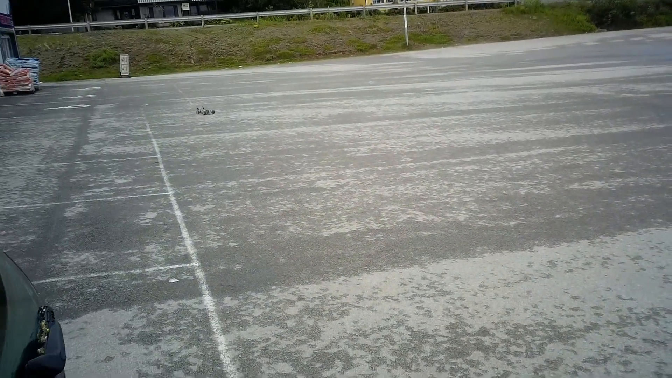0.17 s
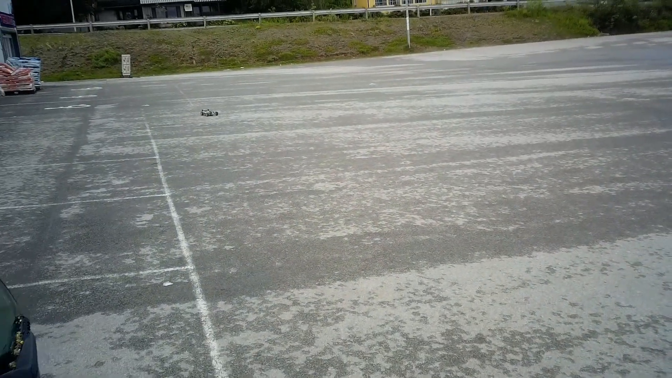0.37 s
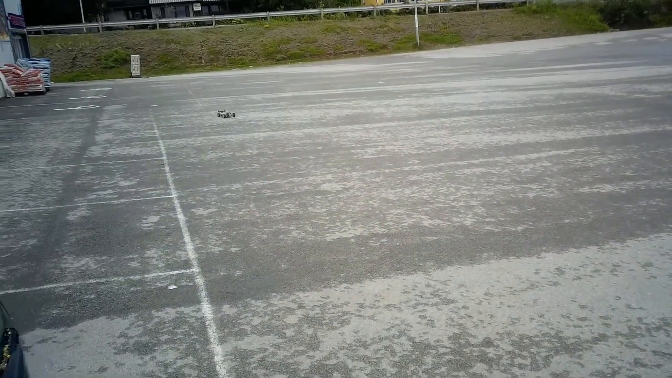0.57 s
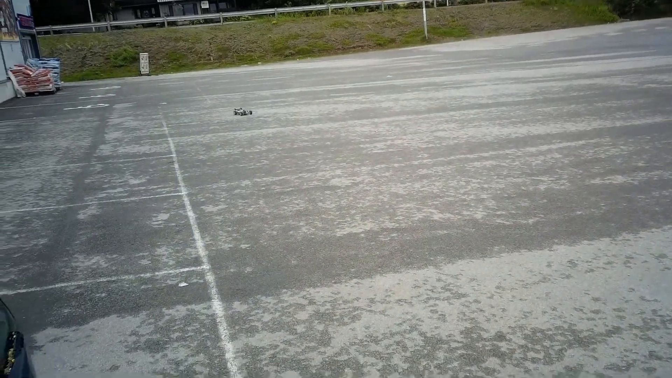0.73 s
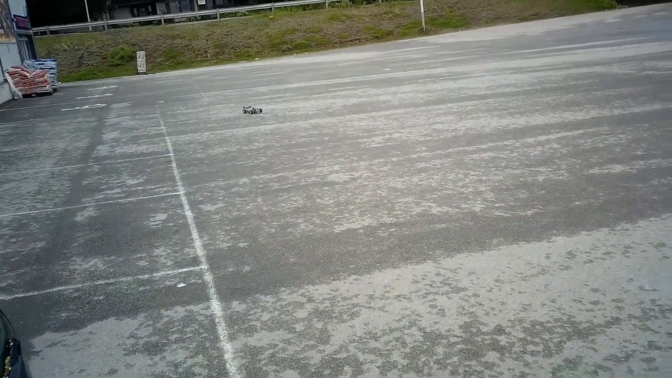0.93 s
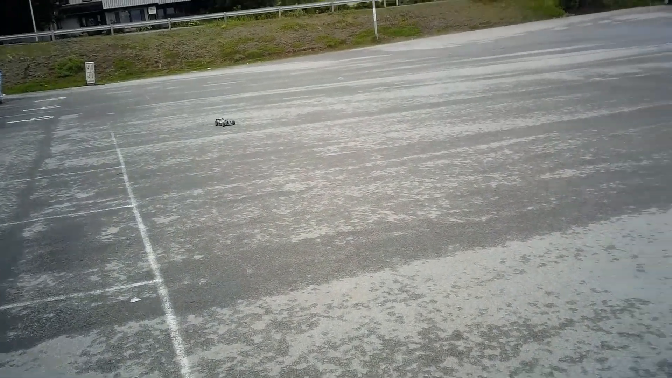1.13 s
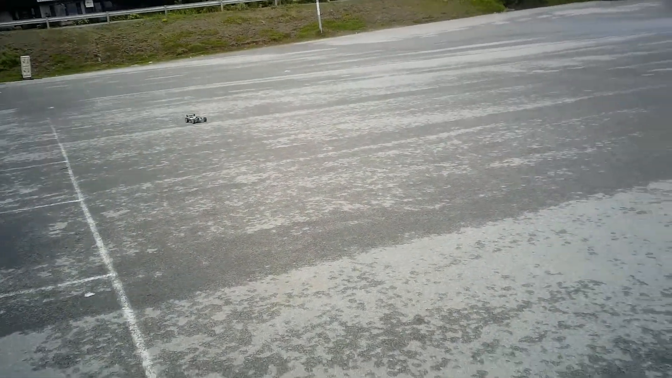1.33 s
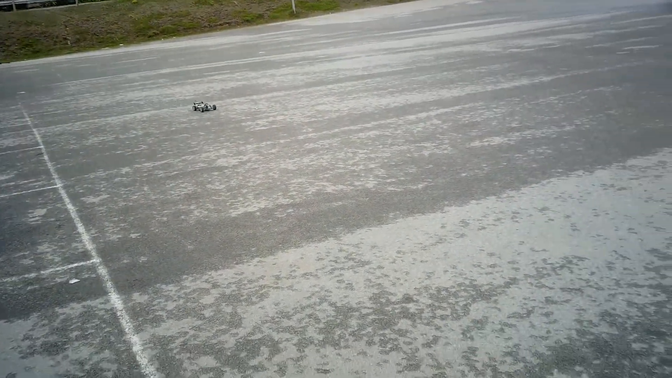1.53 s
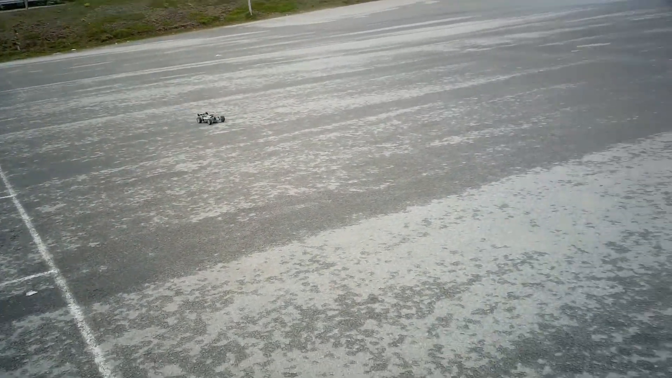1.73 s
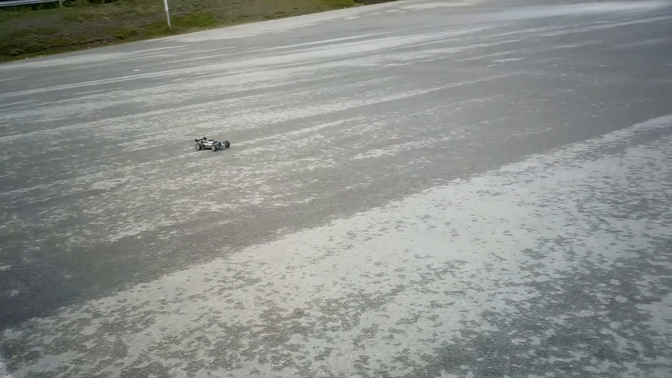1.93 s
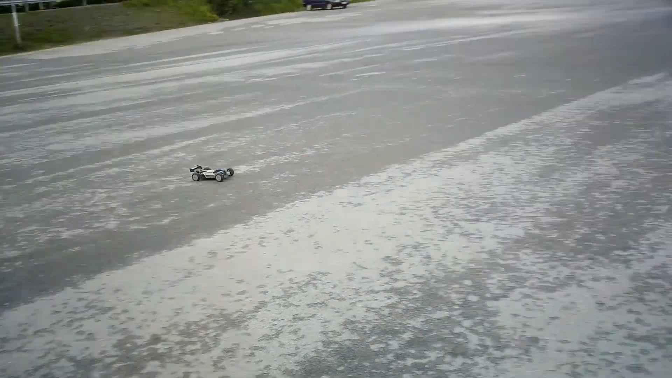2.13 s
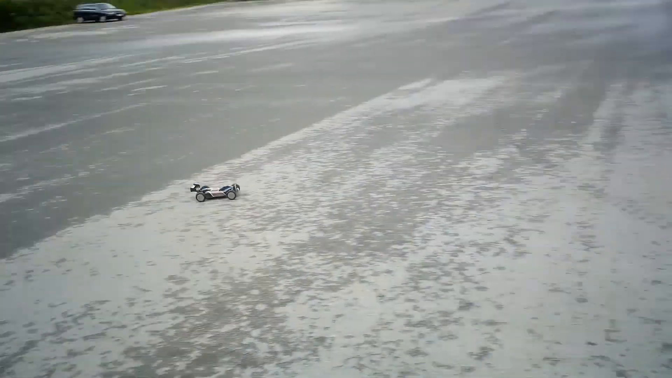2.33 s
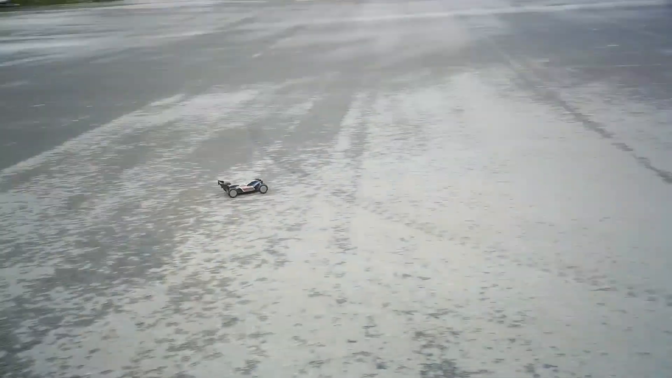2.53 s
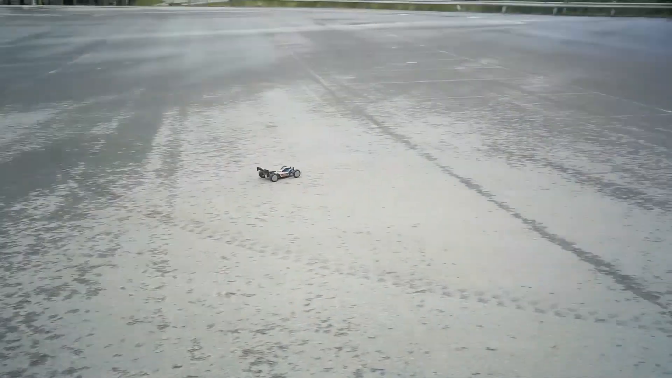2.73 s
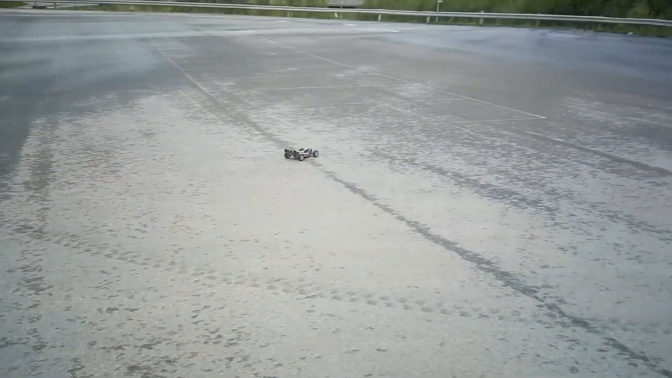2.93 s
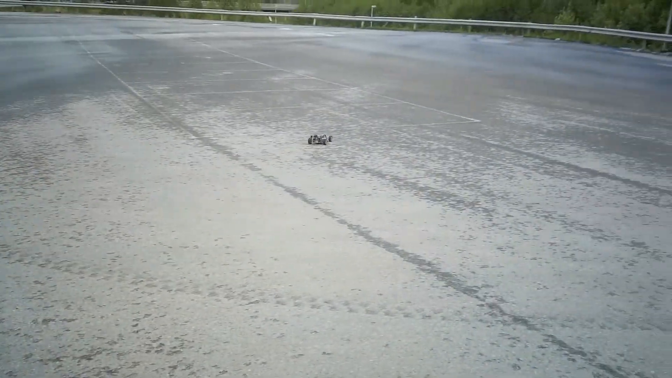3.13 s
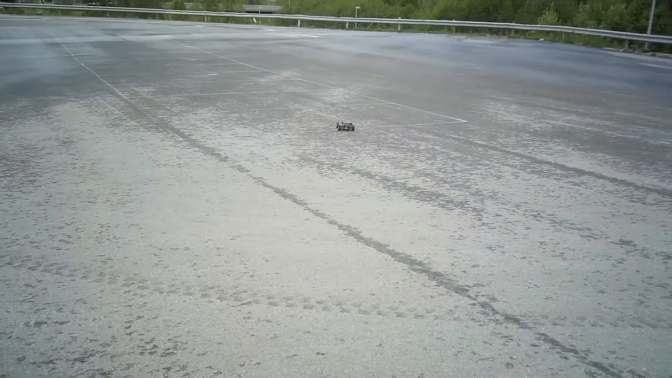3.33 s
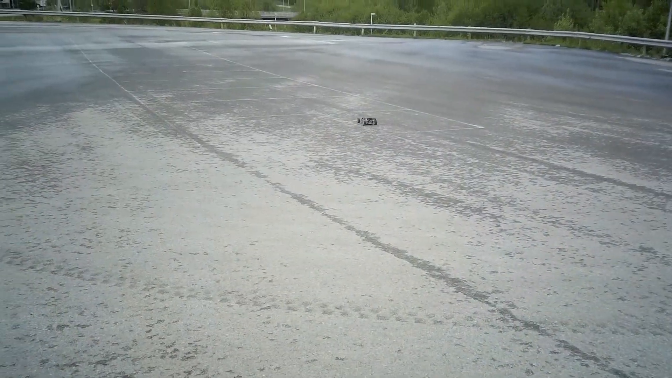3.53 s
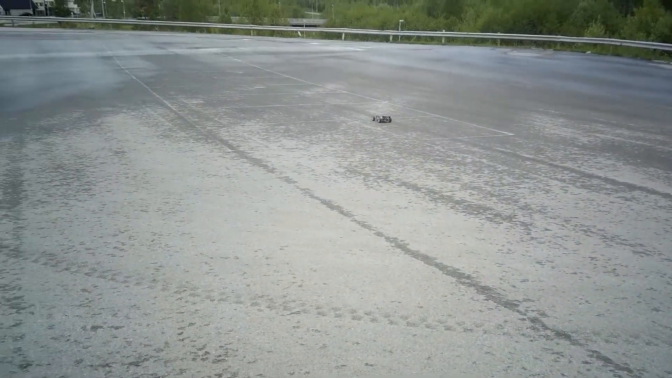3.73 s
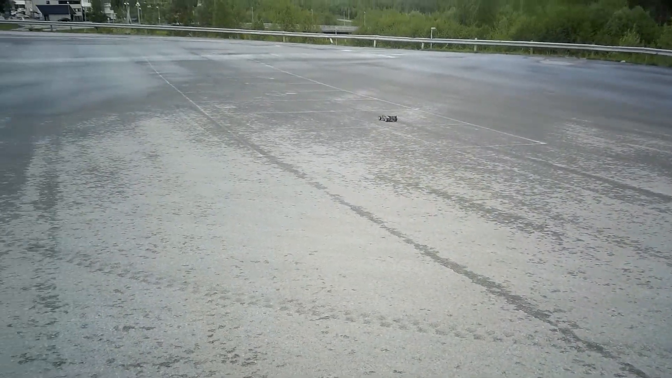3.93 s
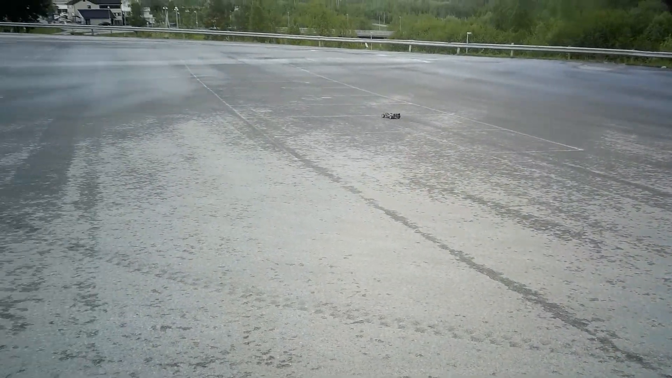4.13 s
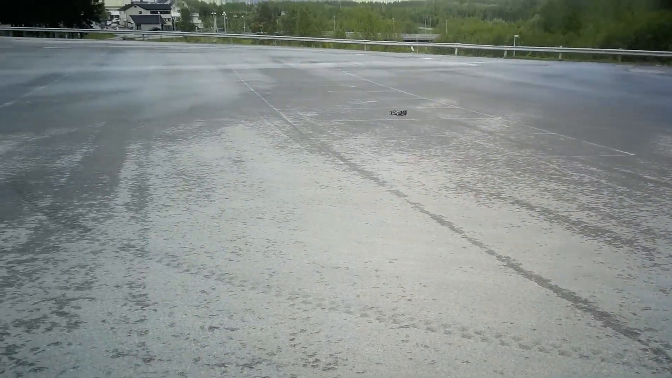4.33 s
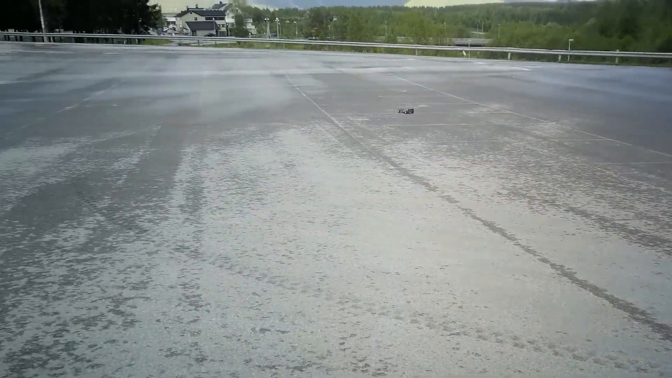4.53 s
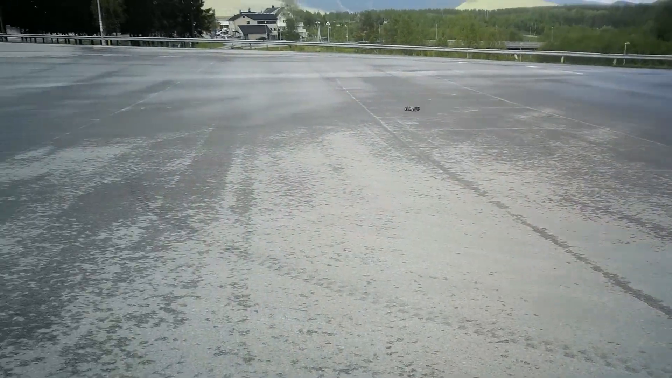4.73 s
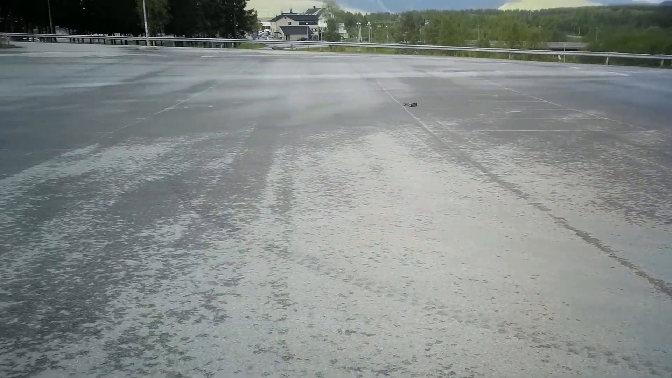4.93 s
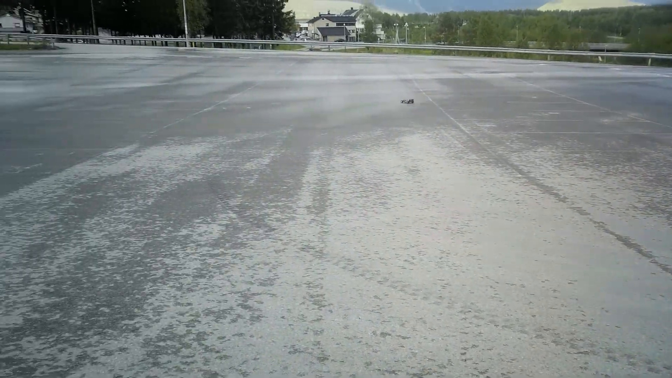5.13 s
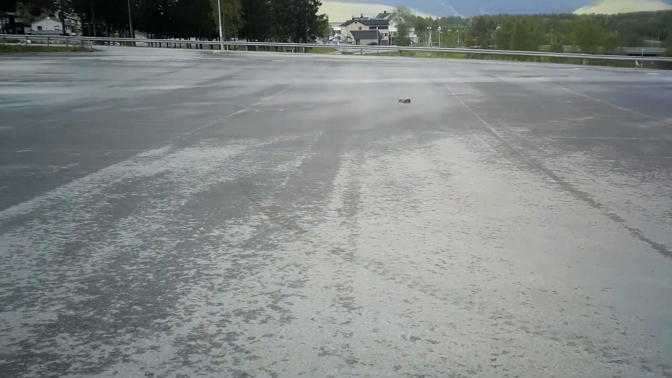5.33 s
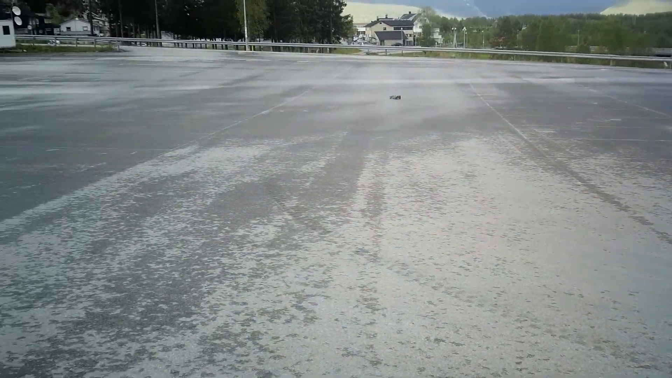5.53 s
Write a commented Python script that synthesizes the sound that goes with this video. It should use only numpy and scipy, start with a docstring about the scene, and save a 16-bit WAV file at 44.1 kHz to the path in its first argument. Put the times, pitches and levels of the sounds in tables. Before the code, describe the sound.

Outdoors, a shoe scuffs grit, then a toy-sized electric car's rough gear whine climbs, passes with tyre hiss, drops, and surges away.

```python
"""Electric model car on gritty asphalt

A small car accelerates across a parking lot, passes a few metres away and speeds off in bursts.
Two gear meshes whine as smeared tones through resonances and throb with each turn of the spur gear.
Loose teeth rattle the chassis as gated noise; tyres roll and skid as dense coloured grains.
A shoe scuffs close by at the start, and noise bands with a rough low tone make the far traffic."""
import sys
import numpy as np
from scipy import signal
from scipy.fft import rfft, irfft
from scipy.io import wavfile

SR = 44100
rng = np.random.default_rng(int(sys.argv[2]) if len(sys.argv) > 2 else 0)


def to_wav(s):
    """Save 16-bit WAV."""
    ch = np.atleast_2d(s).T  # columns
    pcm = np.round(np.clip(ch, -1, 1) * 32767)  # PCM
    wavfile.write(sys.argv[1], SR, pcm.astype(np.int16))


N = 250908
TIME = np.arange(N) / SR  # s

SPUR_TEETH = 50
CRUISE_HZ = 4300  # tooth rate at which the growth with speed is 0 dB
# noise colour of the struck chassis: [f/Hz, relative level per Hz/dB]
CHASSIS_COLOUR = [(400, -5), (1500, -4.5), (3600, 0.5), (5000, -15), (5400, -25), (9000, -49), (15000, -51)]
# sharpest resonances of the gearbox housing: [centre f/Hz, width/Hz, level/dB]
HOUSING_MODES = [(2350, 500, -6), (4270, 200, 0), (4700, 280, 1.5), (5800, 300, -10), (7000, 250, -11)]


def undb(db):
    """Decibels to gain."""
    return 10 ** (np.asarray(db) / 20)


def unit(x):
    """Scale to an rms of one."""
    return x / np.sqrt(np.mean(np.abs(x) ** 2))


def curves(table):
    """Each column of a table, joined by straight lines in time."""
    s, *columns = np.transpose(table)
    return [np.interp(TIME, s, column) for column in columns]


def swell(start, end, amount, attack, release):
    """Rise by some amount, hold until the end, fall back; times in s."""
    rise = (TIME - start) / attack
    fall = 1 - (TIME - end) / release
    return amount * np.clip(np.minimum(rise, fall), 0, 1)


def colour(x, points):
    """Filter by a spectrum of (Hz, dB) points, falling below the first, level above the last; rms one."""
    hz, db = np.transpose(points)
    octave = np.log2(np.fft.rfftfreq(N, 1 / SR) + 1)
    low_cut = np.minimum(2 ** octave / hz[0], 1) ** 2
    gain = undb(np.interp(octave, np.log2(hz), db)) * low_cut
    return unit(irfft(rfft(x) * gain, N))


def response(hz, modes):
    """Summed-power gain of (centre Hz, width Hz, dB) resonances; each is 6 dB down at its width."""
    power = 0
    for centre, width, db in modes:
        power = power + undb(2 * db) / (1 + ((hz - centre) / (width * 0.5)) ** 2) ** 2
    return np.sqrt(power)


def resonate(x, modes):
    """Ring a set of resonances; rms one."""
    gain = response(np.fft.rfftfreq(N, 1 / SR), modes)
    return unit(irfft(rfft(x) * gain, N))


def wander(rate_hz):
    """Smooth chance of spread one, with little motion faster than the rate."""
    hz = np.fft.rfftfreq(N, 1 / SR)
    return unit(irfft(rfft(rng.standard_normal(N)) / (1 + (hz / rate_hz) ** 2), N))


def grains(per_second, spread_db):
    """Tiny impacts at random moments, a few much stronger than the rest."""
    struck = rng.random(N) < per_second / SR
    strength_db = spread_db * np.minimum(rng.exponential(size=N), 4)
    return struck * rng.standard_normal(N) * undb(strength_db)


def throb(turns, peak_db):
    """An off-centre gear binds briefly once a turn, never twice alike; a negative peak is a dip."""
    bind = np.cos(np.pi * turns) ** 6
    return unit(undb(peak_db * bind + 1.7 * wander(92)))


def mesh_tone(cycles, rough, width_hz):
    """One partial of a gear mesh, rms one; backlash smears a share of it into a narrow band."""
    smear = unit(wander(width_hz) + 1j * wander(width_hz))
    tone = np.real((1 + rough * smear) * np.exp(2j * np.pi * cycles))
    return unit(tone / np.hypot(1, rough))


def car():
    """Gears and tyres ahead of the path's losses: both grow with speed and load, the skid shakes them."""
    # motor speed: [t/s, spur tooth rate f/Hz]
    speed = [(0.78, 628), (0.87, 801), (0.915, 878), (0.96, 1203), (1.015, 1210), (1.04, 1438),
             (1.08, 1442), (1.1, 1622), (1.19, 1638), (1.29, 2011), (1.4, 2364), (1.5, 2503), (1.55, 2866),
             (1.63, 2986), (1.68, 3544), (1.78, 3820), (1.82, 4090), (1.89, 4286), (1.925, 4822),
             (1.975, 4855), (2.02, 4623), (2.09, 4884), (2.17, 4801), (2.25, 5066), (2.285, 4953),
             (2.44, 5103), (2.47, 4375), (2.6, 4204), (2.72, 3470), (2.76, 2607), (2.8, 2001), (3.55, 2147),
             (3.75, 2105), (3.87, 2214), (3.97, 2356), (4.11, 2643), (4.42, 3605), (4.5, 4024),
             (4.57, 3850), (4.6, 3486), (4.84, 3393), (4.9, 3780), (5, 3828), (5.05, 3568), (5.22, 3255),
             (5.58, 3845), (5.69, 3984)]
    # pushes of throttle or brake, which add up: [start t/s, end t/s, load/dB, attack/s, release/s]
    pushes = [(-0.05, 0.133, 8, .04, 0.047), (0.493, 0.622, 6.5, 0.036, 0.02),
              (0.773, 1.085, 3, 0.031, 0.15), (1.28, 2.429, 2.5, 0.035, .03),
              (1.369, 2.42, 3, 0.029, 0.047), (1.884, 1.996, 1, .03, 0.29), (2.718, 2.755, 1, 0.037, 0.013),
              (3.539, 4.654, 11, 0.04, 0.28), (4.417, 4.57, 2, 0.056, 0.041), (4.83, 5.032, 13, 0.12, 0.24),
              (5.356, 5.697, 12.5, 0.35, 0.049)]
    # tyres slide through the turn: one row of [start t/s, end t/s, rise over rolling/dB, attack/s, release/s]
    skid = (2.47, 3.302, 6.86, 0.35, 0.14)
    # off the throttle, slack teeth let the tones fade: [start t/s, end t/s, level/dB, attack/s, release/s]
    freewheel = [(1.1, 1.275, -8, 0.087, 0.016), (2.438, 2.71, -3, 0.018, 0.023),
                 (2.76, 3.504, -6, 0.035, 0.04), (4.587, 4.863, -5, 0.047, 0.057),
                 (5.14, 5.326, -14, 0.04, 0.053)]
    # the car creeps off: one row of [start t/s, end t/s, gain, attack/s, release/s]
    roll_off = (.77, 1.22, 1, .03, .08)

    tooth_hz, = curves(speed)
    octaves = np.log2(tooth_hz / CRUISE_HZ)
    load_db = sum(swell(*push) for push in pushes)
    skid_db = swell(*skid)
    slack_db = sum(swell(*pause) for pause in freewheel)
    teeth = np.cumsum(tooth_hz * (1 + .004 * wander(25))) / SR  # bumps jog the motor speed

    # base levels at cruising speed without load; growth in dB per octave of speed
    tones = whine(teeth, tooth_hz, load_db) * undb(6 * octaves + slack_db)
    knocking = undb(-24.5 + load_db + 6 * octaves) * rattle(teeth)
    rasping = undb(-35 + 1.86 * load_db + 6 * octaves) * rasp(teeth)
    shake = undb(0.74 * skid_db)  # dB of gear clatter per dB of skid
    creeping = crawl(teeth, tooth_hz) * swell(*roll_off)
    hissing = sizzle(teeth) * undb(-42 + 51 * octaves + load_db)  # steep: comes only near top speed
    gears = tones + (knocking + rasping) * shake + creeping + hissing
    rolling = tyres() * undb(-20 + 3.5 * octaves + 0.41 * load_db + skid_db)
    return gears, rolling


def whine(teeth, tooth_hz, load_db):
    """Spur mesh with overtones, and the slower final gear; tones flare as they cross resonances."""
    # resonances that radiate the spur's tones: [centre f/Hz, width/Hz, level/dB]
    radiation = [(1260, 1200, -1.5), (2030, 950, 1), (2500, 520, 5), (2790, 330, -2.5), (3893, 360, 2),
                 (4323, 180, -3), (4690, 600, -1.5), (5140, 240, -5.5), (5660, 2200, -5.5),
                 (6900, 2600, -11), (9100, 620, -12.5)]
    # bands where the high overtones radiate well: [centre f/Hz, width/Hz, level/dB]
    flare = [(4880, 280, 8.5), (7450, 850, 0)]
    # resonances that radiate the final gear: [centre f/Hz, width/Hz, level/dB]
    axle = [(1366, 380, 0.5), (1870, 650, -3), (2370, 370, 2), (2840, 980, -1)]
    # how ragged the whine is: most in the close pass, also rough just after it and near 4.3 s:
    # [t/s, roughness 0-1]
    roughness = [(1, .3), (1.5, .6), (1.85, .8), (2.03, .9), (2.12, .65), (2.4, .5), (2.55, .8), (2.75, .2),
                 (3.6, .3), (3.8, .22), (4.3, .68), (4.55, .25), (5.02, .15), (5.5, .4)]
    # the car turns away after passing: [t/s, view from 0 side to 1 behind]
    facing = [(2.6, 0.039), (3.25, 0.96)]
    # spur tones surge out of the clatter: [start t/s, end t/s, level/dB, attack/s, release/s]
    surges = [(1.274, 1.45, 2.5, .02, .1), (1.911, 1.98, 2.5, 0.023, 0.027),
              (2.08, 2.126, 6.5, 0.016, 0.047), (2.27, 2.306, 6.5, 0.019, .02),
              (2.351, 2.42, 6.5, .02, .02), (2.739, 2.756, 7, 0.013, .012), (3.7, 3.86, 4.5, .05, 0.047),
              (4.429, 4.569, 1.5, 0.032, .03), (4.89, 5.03, 2, 0.028, .12), (5.56, 5.692, 1, .025, 0.028)]
    # the final gear bites and sings out: [start t/s, end t/s, level/dB, attack/s, release/s]
    bites = [(1.61, 1.89, 7, 0.059, 0.034), (2.46, 2.62, 7.5, .03, 0.058), (3.564, 4.131, 6, .04, 0.06),
             (4.46, 4.62, 6.5, 0.045, .04), (4.881, 5.03, 11, 0.035, .16)]
    pinion_teeth, final_ratio = 11, 0.542  # final gear's tooth rate per spur tooth rate

    turns = teeth / SPUR_TEETH
    rough, = curves(roughness)
    away = undb(-6.5 * curves(facing)[0])  # the fundamental radiates less to the rear
    # inertia evens out the binding at speed, while the teeth shudder and chatter more within their play
    bind_db = 5.2 * np.minimum(3400 / tooth_hz, 1) ** 1.2
    shudder_hz = 75 * rough * tooth_hz / CRUISE_HZ * wander(90)
    chatter = 2.1 * rough + 2 * (tooth_hz / 5000) ** 12
    # at a crawl the teeth keep losing contact
    contact = undb(1.5 * np.minimum(1400 / tooth_hz, 1) ** 4 * wander(16))
    # the off-centre spur swings the pitch once a turn
    swung = teeth + .09 * np.sin(2 * np.pi * turns) + np.cumsum(shudder_hz) / SR
    # the wobbling pinion adds a strand on either side of each tone
    strands = unit(1 + .8 * rough * mesh_tone(teeth / pinion_teeth, rough=1.5, width_hz=90))

    first = away * response(tooth_hz, radiation) * mesh_tone(swung, 1.3 * rough, width_hz=170)
    second = response(2 * tooth_hz, radiation) * mesh_tone(2 * swung, 2.1 * rough, width_hz=220)
    third = mesh_tone(3 * swung, rough=2.5, width_hz=330)
    fourth = mesh_tone(4 * swung, rough=8, width_hz=900)
    upper = resonate(third + .5 * fourth, flare)
    # each part takes up its own share of the load, dB per dB
    fundamental = undb(-24 + 1.2 * load_db) * first
    overtones = (undb(-19.5) * second + undb(-37) * upper) * undb(0.8 * load_db)
    spur = (fundamental + overtones) * strands * throb(turns, bind_db) * contact

    final = mesh_tone(final_ratio * teeth, chatter, width_hz=280)
    final = resonate(final, axle) * throb(turns / 2, peak_db=8)
    surge_db = sum(swell(*surge) for surge in surges)
    bite_db = sum(swell(*bite) for bite in bites)
    return undb(surge_db) * spur + undb(-27 + 0.31 * load_db + bite_db) * final


def rattle(teeth):
    """Teeth knock unevenly, hardest once a turn, ring gearbox and plastic chassis, and tick in the treble."""
    # broad resonances of the chassis: [centre f/Hz, width/Hz, level/dB]
    chassis_modes = [(1176, 790, -0.5), (2150, 730, 0.5), (3070, 600, -10), (4290, 2050, -0.5),
                     (5930, 590, -9.5), (7100, 1400, -7.5), (8980, 960, -10)]
    # broad treble tick of the teeth: [centre f/Hz, width/Hz, level/dB]
    tick = [(12200, 2600, -19)]
    contact = np.exp(-(teeth % 1) / 0.18)  # a burst at each tooth
    blows = contact * rng.standard_normal(N) * throb(teeth / SPUR_TEETH, peak_db=1)
    return unit(resonate(blows, chassis_modes + tick) + undb(-12) * colour(blows, CHASSIS_COLOUR))


def rasp(teeth):
    """Bouncing teeth spread wide sidebands round the mesh tone, which ring the housing when close to it."""
    sidebands = mesh_tone(teeth, rough=15, width_hz=600)
    sidebands = sidebands + 1.3 * mesh_tone(2 * teeth, rough=9, width_hz=2100)
    return resonate(sidebands, HOUSING_MODES) * throb(teeth / SPUR_TEETH, peak_db=-2)


def crawl(teeth, tooth_hz):
    """At low speed the teeth strike one by one, so blurred higher overtones ring the housing too."""
    overtones = sum(mesh_tone(k * teeth, rough=3, width_hz=260) / k for k in (3, 4, 5))
    fade = np.minimum(1300 / tooth_hz, 1) ** 4  # fades above this tooth rate in Hz
    return resonate(overtones, HOUSING_MODES) * undb(-45) * fade


def sizzle(teeth):
    """Fine treble hiss that pulses with each turn of the spur gear."""
    # noise colour of the hiss: [f/Hz, relative level per Hz/dB]
    hiss = [(2000, -5), (4600, 5), (6500, 0), (7450, 17), (8400, 9), (9500, 17), (10800, 4), (12800, 13),
            (14000, 4), (15200, 0)]
    return colour(rng.standard_normal(N), hiss) * throb(teeth / SPUR_TEETH, peak_db=9)


def sags():
    """Ragged strands that split off below the whine, sink and fade."""
    # strands in the close pass: [start t/s, end t/s, from f/Hz, to f/Hz, level at 1 m/dB]
    strands = [(1.97, 2.07, 4650, 4240, -17.5), (2.13, 2.198, 4620, 4260, -19)]
    fade_s = .02
    out = 0
    for start, end, from_hz, to_hz, db in strands:
        cycles = np.cumsum(np.interp(TIME, [start, end], [from_hz, to_hz])) / SR
        strand = mesh_tone(cycles, rough=1.2, width_hz=130)
        out = out + swell(start, end, undb(db), fade_s, fade_s) * strand
    return out


def tyres():
    """Tread blocks slap dense grit; the load jitters over the rough asphalt."""
    # noise colour of the rolling tyres: [f/Hz, relative level per Hz/dB]
    tread = [(100, -26), (210, -14.5), (330, -3.5), (480, 1.5), (800, 0), (1300, 3.5), (1700, 0.5),
             (2600, -3), (3300, -6), (5000, -10), (6500, -19.5), (9500, -28), (12000, -49), (15000, -43)]
    return colour(grains(per_second=11000, spread_db=1.0), tread) * undb(1.17 * wander(25))


def hollow():
    """A gliding band of noise in the tyres' roar sinks as the car comes near and rises again."""
    # glide of the band: [t/s, centre f/Hz, level at 1 m/dB]
    glide = [(1.7, 1497, -45), (2.08, 1250, -23), (2.25, 780, -24.5), (2.38, 703.6, -27.5),
             (2.47, 490, -27.5), (2.66, 367.8, -35), (2.95, 500.6, -33), (3.4, 516, -48)]
    centre_hz, db = curves(glide)
    band = unit(wander(130) + 1j * wander(130))
    carrier = np.exp(2j * np.pi * np.cumsum(centre_hz) / SR)
    return unit(np.real(band * carrier)) * undb(db)


def knocks():
    """Flung stones, bumps and clashing teeth: a brief crack and a short ring of the struck part."""
    # single knocks as heard: [t/s, ring's peak level/dB, ring f/Hz, width/Hz, 60 dB decay/s]
    blows = [(0.866, -49, 4800, 600, 0.018), (1.602, -23.5, 2450, 1400, .011),
             (1.972, -22, 4740, 594, 0.036), (2.473, -31, 2350, 500, 0.023),
             (2.935, -33, 510, 109.9, 0.051), (3.252, -32, 2692, 1800, 0.038)]
    attack_s = 0.0012
    out = 0
    crack = colour(rng.standard_normal(N), CHASSIS_COLOUR)
    for s, db, hz, width, t60 in blows:
        rise = np.clip((TIME - s) / attack_s, 0, 1)
        age = np.maximum(TIME - s - attack_s, 0)
        ring = mesh_tone(hz * TIME, rough=.5, width_hz=width / 2)
        out = out + rise * undb(db - 60 * age / t60) * (ring + undb(-9) * crack)
    return out


def grit():
    """The shoe grinds over loose grains; single stones crack sharply."""
    # stones cracking under the shoe: [t/s, level before colouring/dB, 60 dB decay/s]
    stones = [(0.328, -32, 0.0054), (0.338, -35, 0.01), (0.3456, -27.5, 0.02), (0.356, -34, 0.025),
              (0.3669, -27.5, 0.018), (0.444, -31.5, 0.026)]
    # strokes of the shoe: [start t/s, end t/s, rise over the resting shoe/dB, attack/s, release/s]
    scuffs = [(0.321, 0.343, 26.5, .007, 0.018), (0.324, 0.372, 34, 0.027, 0.12),
              (0.364, 0.468, 29.5, 0.05, 0.11), (0.69, 0.706, 11, 0.024, 0.024)]
    # noise colour of the shoe: [f/Hz, relative level per Hz/dB]
    sole = [(250, -20), (400, -7.5), (800, -1), (1700, -4), (2310, 0.5), (3000, -6.5), (4100, -2),
            (5000, -11.5), (6400, -19.5), (9000, -19.5), (14000, -53)]
    press_db = -69.5 + np.max([swell(*stroke) for stroke in scuffs], axis=0)  # from the resting level
    scrape = unit(grains(per_second=6000, spread_db=2)) * undb(press_db)
    noise = rng.standard_normal(N)
    for s, db, t60 in stones:
        age = TIME - s
        decay = np.exp(-np.log(1000) * np.abs(age) / t60)
        scrape = scrape + (age >= 0) * undb(db) * decay * noise
    return colour(scrape, sole) * np.std(scrape)


def background():
    """Far traffic noise that swells slowly, a road's rumble and a low idling engine as a rough tone."""
    # noise colour of the traffic: [f/Hz, relative level per Hz/dB]
    traffic_colour = [(22, -7), (75, -4.5), (130, -6), (250, -5.5), (450, -2), (600, -8), (870, 1.5),
                      (1200, -5), (2500, -17), (4500, -36), (6000, -30), (9200, -32), (12500, -42),
                      (15000, -32)]
    # low rumble of a road further off: [t/s, level/dB]
    road_level = [(0, -79), (3, -65), (4.5, -59.5), (5.69, -69.5)]
    # a far engine idling: [t/s, level/dB]
    idle_level = [(0, -64.5), (0.55, -63.5), (0.9, -70), (1.5, -75), (5.69, -100)]
    traffic = colour(rng.standard_normal(N), traffic_colour) * undb(-52.5 + .5 * wander(2.1))
    road = resonate(rng.standard_normal(N), [(280, 240, 0)]) * undb(curves(road_level)[0])
    engine = mesh_tone(71.5 * TIME, rough=1.6, width_hz=9)  # idles at 71.5 Hz
    return traffic + road + engine * undb(curves(idle_level)[0])


def scene():
    """The car, weaker with distance, its knocks, the shoe and the background."""
    # the car's path: [t/s, distance/m]
    path = [(1.1, 27), (1.45, 11), (1.7, 11.1), (2, 8.65), (2.5, 7.5), (3, 9), (3.5, 13.65), (4.5, 21.24),
            (5.69, 36.4)]
    distance_m, = curves(path)
    gears, rolling = car()
    # tyre noise starts at ground level and fades faster with distance, in dB per m
    ground = undb(-0.2158 * distance_m)
    passing = (gears + sags() + hollow() + rolling * ground) / distance_m
    return (passing + knocks() + grit() + background())[None]


def record(dry):
    """A steep elliptic low-pass cuts the top above 15.3 kHz."""
    low_pass = signal.ellip(8, .2, 70, 15300, fs=SR, output="sos")  # order, ripple dB, stop dB, Hz
    return signal.sosfilt(low_pass, dry)


dry = scene()
out = record(dry)
to_wav(out)
```